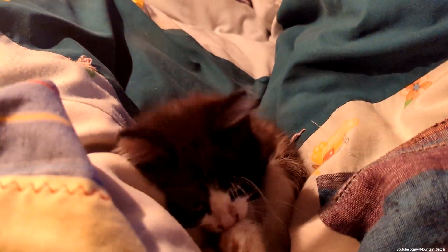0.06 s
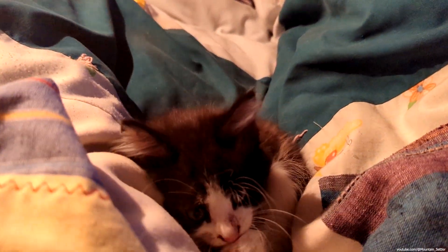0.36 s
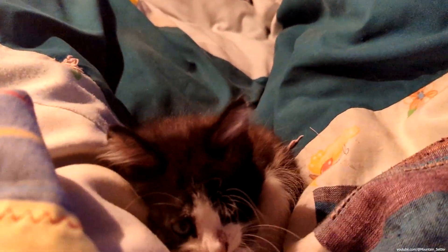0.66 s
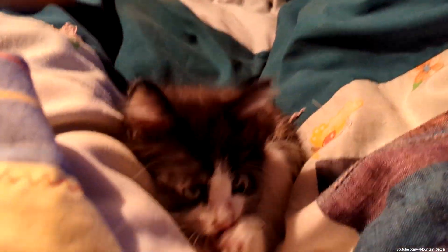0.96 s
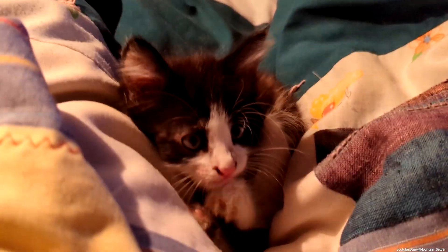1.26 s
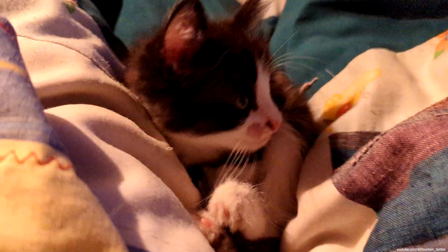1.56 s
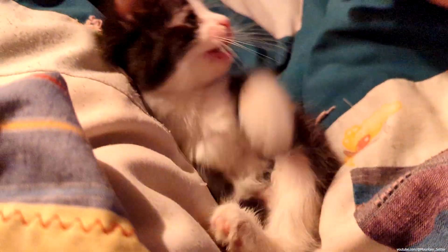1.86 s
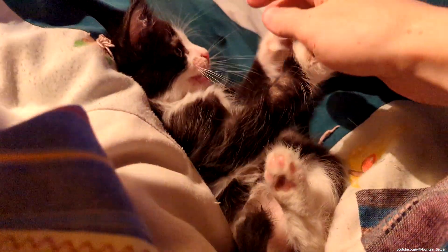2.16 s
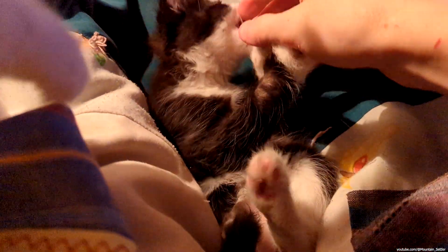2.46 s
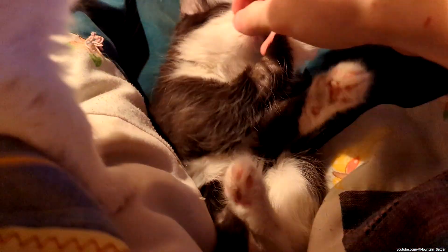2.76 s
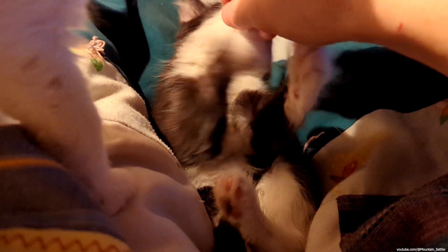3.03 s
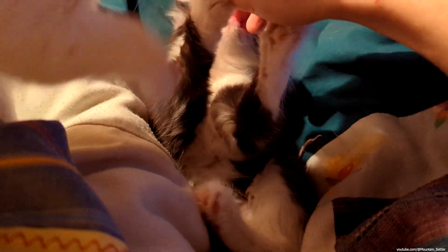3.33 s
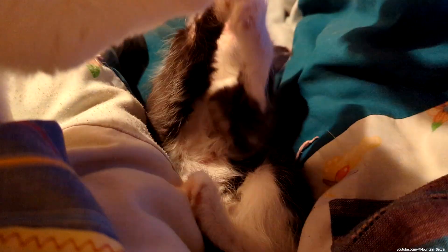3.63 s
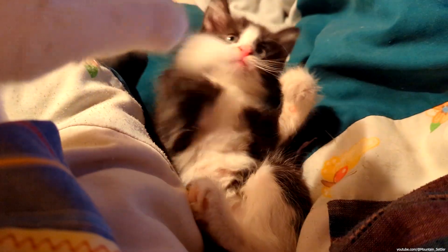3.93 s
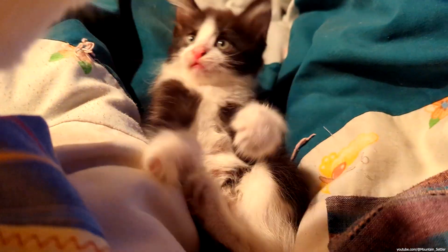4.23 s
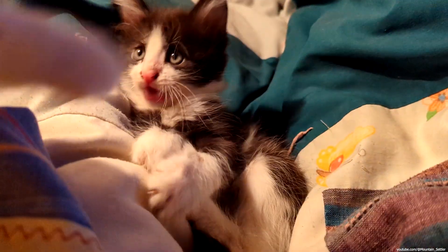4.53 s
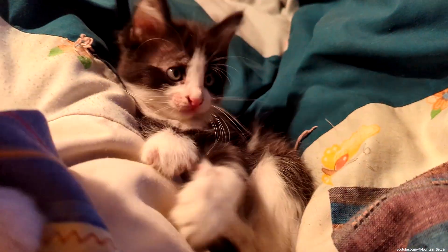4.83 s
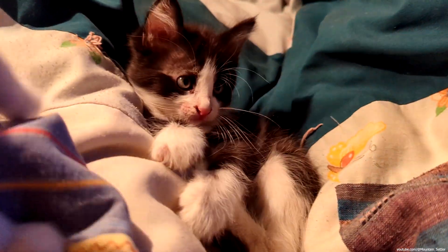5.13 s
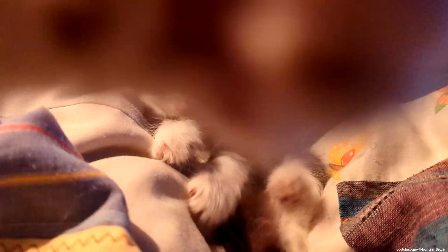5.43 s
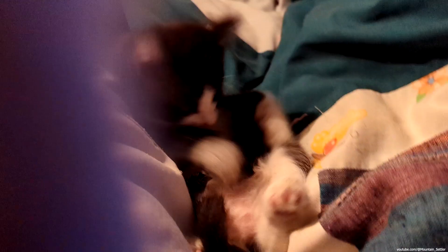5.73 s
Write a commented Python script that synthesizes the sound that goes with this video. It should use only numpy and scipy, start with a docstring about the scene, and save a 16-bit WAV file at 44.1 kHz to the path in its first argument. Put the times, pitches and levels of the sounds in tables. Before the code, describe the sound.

A kitten purrs close by as a quilt rustles faintly, and cloth clicks against the microphone near the end.

```python
"""A kitten's purr is heard first, close to a hand-held camera in a quiet room.
The vocal folds in its voice box open and snap shut about 26 times a second:
firmly as it breathes in, softly and with a low puff as it breathes out.
The quilt rustles as it plays, and a claw catches once. Near the end, cloth brushes the camera
and clicks against it. Behind it all the room rumbles and hisses faintly."""
import sys
import numpy as np
from scipy import signal
from scipy.fft import rfft, irfft, next_fast_len
from scipy.io import wavfile
from scipy.ndimage import map_coordinates

SR = 44100
rng = np.random.default_rng(int(sys.argv[2]) if len(sys.argv) > 2 else 0)


def store_wav(level_fs):
    """Save 16-bit WAV to argv[1]."""
    pcm = np.round(np.clip(np.atleast_2d(level_fs), -1, 1) * 32767)
    wavfile.write(sys.argv[1], SR, pcm.T.astype(np.int16))


N = 259749

# Tone of air rushing through the throat and nose: f/Hz, level/dB
AIR_TONE = [(200, 12), (550, 7.5), (860, 5), (1200, 4), (1650, 0), (1950, -17), (2650, -4), (3300, -19),
            (4000, -23.5), (4600, -12), (5500, -32.5), (6600, -23.5), (9000, -35), (14000, -67.5)]
# Tone of the hiss from the nose when breathing out: f/Hz, level/dB
NOSE_TONE = [(500, 17), (1200, 18), (2000, 2.5), (3500, -3), (5600, -7), (6700, -0.5), (8000, -13),
             (11000, -43.5)]


def purr(flutter_hz=425, chest_in_hz=84, chest_out_hz=78):
    """In each beat the folds part with a flutter and a wisp of air, the chest swings, the folds shut."""
    body, snaps, air, nose = np.zeros((4, N))
    t = np.arange(-SR // 20, SR // 20) / SR  # zero is the moment the folds meet
    for s, inward, progress, snap_db, flutter_db in beats():
        slack = np.clip((-45 - snap_db) / 12, 0, 1)  # slack folds meet softly and unevenly
        snap_db += rng.normal(0, 1.2 + 1.8 * slack)
        s += slack * rng.normal(0, .0015)
        touch = bell(t, .00002 + .00014 * slack)
        touch = touch / touch.sum()
        flow = 1 if inward else -1  # the pressure flips with the direction of the air
        open_s = .0112 + rng.normal(0, .0006)
        since_open = t + open_s
        # a stronger flow flutters faster
        hz = flutter_hz * np.exp(.02 * (flutter_db + 25.5) + rng.normal(0, .13))
        flutter = np.cos(2 * np.pi * hz * (since_open + .0012)) * bell(since_open, .0017)
        add(body, s, flow * amp(flutter_db + 1.5) * flutter)
        # the chest swing grows more slowly than the flutter
        if inward:
            swing = amp(-11 + .55 * flutter_db) * bell(t + .0057, .0075)
            chest = swing * np.cos(2 * np.pi * chest_in_hz * (t + .0029))
        else:
            swing = amp(-14 + .35 * snap_db) * bell(t + .0026, .0042)
            chest = swing * np.cos(2 * np.pi * chest_out_hz * (t + .0078))
        add(body, s, chest)
        # a small snap as the folds part, the main one as they meet, then a light bounce
        add(snaps, s - open_s - .0017, flow * amp(flutter_db - 16.5 + rng.normal(0, 1)) * touch)
        add(snaps, s - .0007, flow * amp(snap_db + 17.5) * touch)
        add(snaps, s + rng.uniform(.0006, .002), flow * amp(snap_db + rng.normal(0, 2.5)) * touch)
        # air leaks most as the folds part and just as they meet
        parting = bell(since_open + .0018, .0026) + .33 * bell(since_open + .007, .008)
        meeting = .4 * bell(t - .001, .003) + .17 * bell(t - .008, .01)
        add(air, s, amp(-28 + .78 * flutter_db) * (parting + meeting))
        if not inward:
            wisp = bell(since_open, .0035) + .5 * bell(t - .004, .015)
            add(nose, s, amp(-61) * bell(progress - .3, .34) * wisp)
    return body + throat(snaps) + air * noise(AIR_TONE) + nose * noise(NOSE_TONE)


# Firm breaths in: first beat t/s, beat rate f/Hz, flutter's crest level/dB,
# place of the crest in the breath (0 to 1), drop/dB half a breath away from the crest
BREATHS_IN = [(.024, 26.3, -31, .39, 16), (.597, 25.3, -30.5, .46, 22), (1.236, 25.8, -30.5, .43, 28),
              (1.83, 24.9, -25.5, .5, 28), (2.444, 24.7, -26.5, .43, 32), (3.012, 25.7, -31.5, .39, 22),
              (3.569, 25.7, -32, .51, 28), (4.219, 25, -26.5, .43, 28), (4.929, 26.2, -29, .41, 28),
              (5.561, 26.1, -27.5, .44, 27)]
# Soft breaths out: first beat t/s, beat rate f/Hz, flutter's starting level/dB
BREATHS_OUT = [(.241, 27.9, -44), (.865, 27.1, -41), (1.537, 27.3, -41), (2.105, 26.7, -40.5),
               (2.719, 27.2, -43), (3.277, 30.6, -48.5), (3.83, 28.7, -43.5), (4.532, 27.2, -41.5),
               (5.226, 27.4, -42), (5.822, 30, -42)]


def beats(jitter_s=.0003, hurry_s=.009):
    """List each closing of the folds: t/s, inward or not, progress (0 to 1), snap/dB, flutter/dB."""
    rows = []
    breaths = [(s, True, *rest) for s, *rest in BREATHS_IN]
    breaths += [(s, False, *rest) for s, *rest in BREATHS_OUT]
    breaths.sort()
    ends = [row[0] for row in breaths[1:]] + [N / SR]
    for (start, inward, rate, *shape), end in zip(breaths, ends):
        count = max(round((end - start) * rate), 1)
        effort = breathe_in if inward else breathe_out
        for k in range(count):
            progress = k / count
            early_s = inward * hurry_s * progress ** 6  # the last beats of a breath in hurry
            s = start + k / rate - early_s + rng.normal(0, jitter_s)
            rows.append((s, inward, progress, *effort(progress, *shape)))
    return rows


def breathe_in(progress, crest_db, crest_at, drop_db):
    """Air is drawn in: the snap firms up fast, grows a little and lets go; the flutter rises and falls."""
    firm_db = -39.5 + .32 * crest_db + 2.5 * progress  # a stronger breath snaps harder
    soft_start = max(1 - progress / .15, 0)
    snap_db = firm_db - 12 * soft_start - 29 * let_go(progress)
    flutter_db = crest_db - drop_db * (2 * (progress - crest_at)) ** 2
    return snap_db, flutter_db


def breathe_out(progress, start_db):
    """Air is let out: snap and flutter start at full strength and sag, and the folds close unevenly."""
    db = start_db - 21.5 * let_go(progress)
    uneven_db = 2.5 * rng.standard_normal() * (progress > 0)
    leak_db = 4.5 * bell(progress - .35, .22)  # the folds meet more softly where the flow peaks
    snap_db = db - 6.5 - 8 * progress - leak_db + uneven_db
    flutter_db = db - 6.5 * progress
    return snap_db, flutter_db


def let_go(progress, hold_share=.75):
    """0 while a breath holds, rising to 1 at its end."""
    return np.interp(progress, [hold_share, 1], [0, 1])


# How strongly the throat and nose ring at each pitch: f/Hz, level/dB
THROAT_RING = [(30, -14), (130, 1.5), (205, 8), (300, 3.5), (600, -2.5), (860, -19.5), (1170, -9.5),
               (1600, -23.5), (1950, -41), (2500, -29.5), (3300, -51.5), (4100, -49.5), (4650, -45.5),
               (5600, -61.5)]


def throat(snaps, pitch_shift=.041, turn_hz=480):
    """The throat rings at every snap; its ringing pitches drift up and down as it moves."""
    tight = np.clip(.5 + .5 * wobble(15), 0, 1)
    low, high = (np.array(THROAT_RING) * [1 + way * pitch_shift, 1] for way in (-1, 1))
    ringing = ring(snaps * (1 - tight), low) + ring(snaps * tight, high)
    # each snap overshoots: a short spike, then a longer swing the other way
    return filtered(ringing, lambda hz: (1j * hz - turn_hz) / (1j * hz + turn_hz))


# Low puffs of outgoing breath: t/s, level/dB, half length/s, f/Hz, tail level/dB
BREATH_PUFFS = [(.362, -26, 0.023, 78, -35.5), (0.972, -30, 0.03, 91.5, -35),
                (1.659, -23.5, .036, 64.5, -46), (2.265, -28, 0.041, 60, -44),
                (2.854, -32, 0.043, 79.1, -45), (3.369, -30.5, 0.037, 58.4, -43),
                (3.925, -29.5, 0.02, 65, -34.5), (4.641, -29, 0.025, 85.5, -32),
                (5.343, -23.5, 0.012, 126, -33.5)]


def puffs(swirl_db=-11, tail_delay_s=.0882, tail_half_s=.064, tail_hz=53.1):
    """Air let out close by makes a slow, wavering swing of pressure with little swirls on it."""
    t = np.arange(N) / SR
    wavering_time = np.cumsum(np.exp(.17 * wobble(60))) / SR
    swing, stir = np.zeros((2, N))
    for *puff, tail_db in BREATH_PUFFS:
        tail = (puff[0] + tail_delay_s, tail_db, tail_half_s, tail_hz)  # a longer, lower swell
        for s, db, half, hz in puff, tail:
            from_peak = wavering_time - np.interp(s, t, wavering_time)
            swing += amp(db) * bell(t - s, half) * np.cos(2 * np.pi * hz * from_peak)
            stir += amp(db) * bell(t - s, 1.5 * half)
    swirls = noise([(40, -.5), (130, -.5), (220, -7), (400, -22.5), (2000, -94)])
    return swing + amp(swirl_db) * stir * swirls


# Paws and a hand sliding on the quilt: t/s, level/dB, half length/s
QUILT_SLIDES = [(0.354, -91, 0.16), (.941, -86, 0.0069), (1.201, -76.5, 0.017), (1.41, -88.5, 0.29),
                (1.97, -85, 0.26)]
# Tone of the rustling quilt: f/Hz, level/dB
QUILT_TONE = [(500, 6), (3000, 4.5), (7000, 8.5), (12400, 3), (14500, -18)]
# A claw catching as the kitten grabs the hand: t/s, level/dB, half length/s
CLAW_CATCHES = [(2.232, -56, .003), (2.249, -65, .016)]
# Tone of the claw's scratch: f/Hz, level/dB
CLAW_TONE = [(600, -22), (1600, -8), (2300, 0), (2900, -12), (6000, -23), (12000, -42)]


def bedding():
    """Fibres of the quilt slide unevenly; a claw adds a lower scratch."""
    grain = unit(amp(5.5 * wobble(500)))
    rustle = swells(QUILT_SLIDES) * stereo_noise(QUILT_TONE, side_db=1)
    scratch = swells(CLAW_CATCHES) * noise(CLAW_TONE)
    return grain * (rustle + scratch)


# Cloth catching on the camera: t/s, level/dB, knock level/dB relative to the click
CLOTH_CLICKS = [(4.1884, -52.5, -17), (5.4899, -46, -5), (5.498, -48, 2.5), (5.506, -36, -9.5),
                (5.512, -44.5, 0), (5.561, -43.5, -28), (5.7201, -27.5, -30)]
# The bright ring of the camera's shell: f/Hz, level/dB
SHELL_TICK = [(800, -61), (2500, -23), (3800, -20.5), (4500, -12.5), (6200, -7.5), (8000, -18),
              (9000, -1.5), (10500, -6.5), (12200, -7), (16000, -19)]
# The duller knock of the shell: f/Hz, level/dB
SHELL_KNOCK = [(500, -22), (1100, 8), (2200, -1.5), (3000, -20.5), (9000, -28.5)]
# Cloth brushing over the camera: t/s, level/dB, half length/s
CLOTH_BRUSHES = [(4.19, -73.5, .008), (5.502, -66, 0.017), (5.565, -70.5, 0.013), (5.672, -78, 0.088),
                 (5.723, -57.5, 0.0066)]
# Tone of the brushing cloth: f/Hz, level/dB
CLOTH_TONE = [(1000, -4), (4000, -5.5), (8000, -0.5), (10000, 5.5), (13500, 3.5), (15300, 2),
              (16500, -36.5)]


def cloth_on_camera(crackle_gain=.043, crackle_s=.015):
    """Cloth brushes the camera and catches: bright clicks with a small knock and a short crackle."""
    t = np.arange(N) / SR
    ticks, knocks = np.zeros((2, N))
    for s, db, knock_db in CLOTH_CLICKS:
        age = t - round(s * SR) / SR
        spike = np.abs(age) < .5 / SR
        fade = (age > 0) * amp(-60 * np.abs(age) / crackle_s)
        contact = spike + crackle_gain * fade * rng.standard_normal(N)
        ticks += amp(db) * contact
        knocks += amp(db + knock_db) * contact
    grain = unit(amp(2 * wobble(760)))
    brush = swells(CLOTH_BRUSHES) * grain * stereo_noise(CLOTH_TONE, side_db=2.5)
    sound = ring(ticks, SHELL_TICK) + ring(knocks, SHELL_KNOCK) + brush
    return sound * amp([[.8], [-.8]])  # a little louder on the left


# Tone of the room's low rumble: f/Hz, level/dB
RUMBLE_TONE = [(45, 6), (100, -14), (165, -11), (210, -12.5), (330, -30), (700, -52.5), (1300, -43.5),
               (6000, -74)]


def room():
    """The room rumbles, and each microphone picks up a faint hiss."""
    hiss = stereo_noise([(700, 1), (2000, 7), (4000, 4.5), (7000, -1.5), (11500, -20.5)], side_db=-16.5)
    return amp(-43.5) * noise(RUMBLE_TONE) + amp(-82) * hiss


def amp(db):
    """Turn decibels into a number to multiply by."""
    return 10 ** (np.asarray(db) / 20)


def unit(x):
    """Scale x to an average strength (rms) of 1."""
    return x / np.sqrt(np.mean(x ** 2) + 1e-20)


def gain(tone, hz):
    """How strong a tone curve of (f/Hz, level/dB) points is at the pitch hz."""
    f, db = np.transpose(tone)
    return amp(np.interp(np.log(hz + 1), np.log(f), db))


def filtered(x, response):
    """Scale and delay each frequency in x as response(hz) says."""
    size = next_fast_len(N + SR // 2)
    hz = np.fft.rfftfreq(size, 1 / SR)
    return irfft(rfft(x, size) * response(hz), size)[..., :N]


def noise(tone):
    """Noise of strength 1, shaped by a tone curve."""
    return unit(filtered(rng.standard_normal(N), lambda hz: gain(tone, hz)))


def stereo_noise(tone, side_db):
    """Noise for two microphones; a higher side_db makes left and right less alike."""
    return noise(tone) + amp(side_db) * noise(tone) * np.array([[1], [-1]])


def wobble(rate):
    """A smooth curve through rate random values a second."""
    return map_coordinates(rng.standard_normal(int(N * rate / SR) + 4), [np.arange(N) * rate / SR])


def bell(t, half):
    """A smooth swell around t = 0."""
    return np.exp(-(t / half) ** 2)


def swells(rows):
    """Add up swells given as t/s, level/dB, half length/s."""
    return sum(amp(db) * bell(np.arange(N) / SR - s, half) for s, db, half in rows)


def ring(taps, tone, size=8192):
    """Let taps ring a body with this tone curve; a tap of 1 rings with a peak of 1."""
    cepstrum = irfft(np.log(gain(tone, np.fft.rfftfreq(size, 1 / SR))))
    # keeping only the first half makes the ringing follow the tap, never lead it
    ringing = irfft(np.exp(rfft(2 * cepstrum[:size // 2], size)))[:size // 2]
    return signal.fftconvolve(taps, ringing / np.abs(ringing).max())[:N]


def add(track, s, sound):
    """Mix a sound into the track, centred on time s."""
    at = round(s * SR) - len(sound) // 2 + np.arange(len(sound))
    inside = (at >= 0) & (at < N)
    track[at[inside]] += sound[inside]


def scene():
    """The kitten in the middle, cloth and room around it."""
    return purr() + puffs() + bedding() + cloth_on_camera() + room()


def record(dry, low_cut_hz=17, top_hz=16200):
    """The camera drops the deepest rumble and the very highest treble."""
    return filtered(dry, lambda hz: (hz < top_hz) * hz ** 4 / (hz ** 4 + low_cut_hz ** 4))


dry = scene()
out = record(dry)
store_wav(out)
```